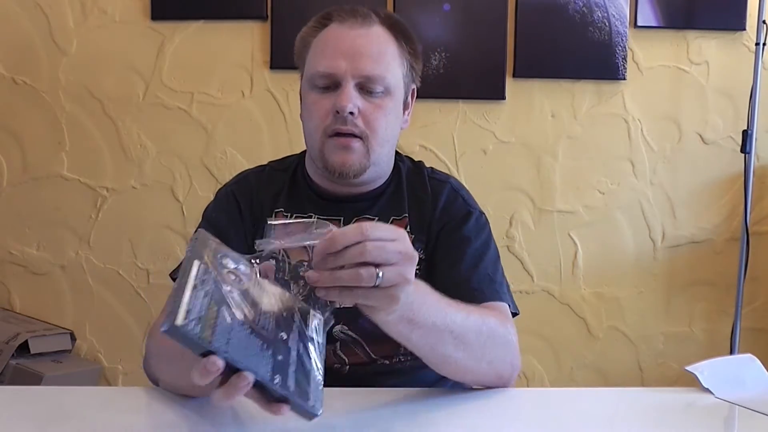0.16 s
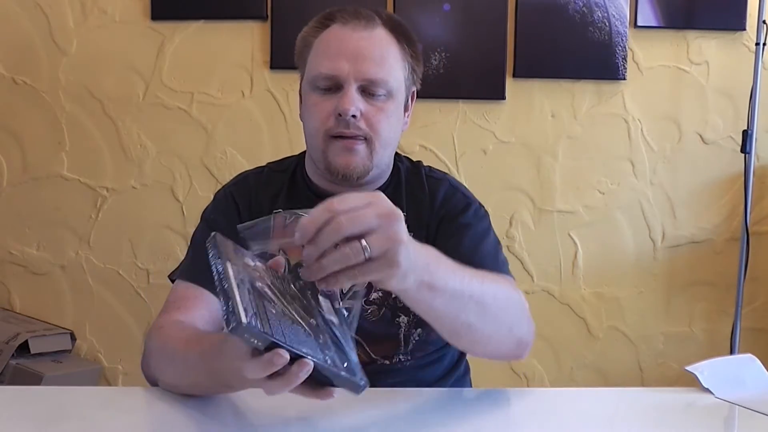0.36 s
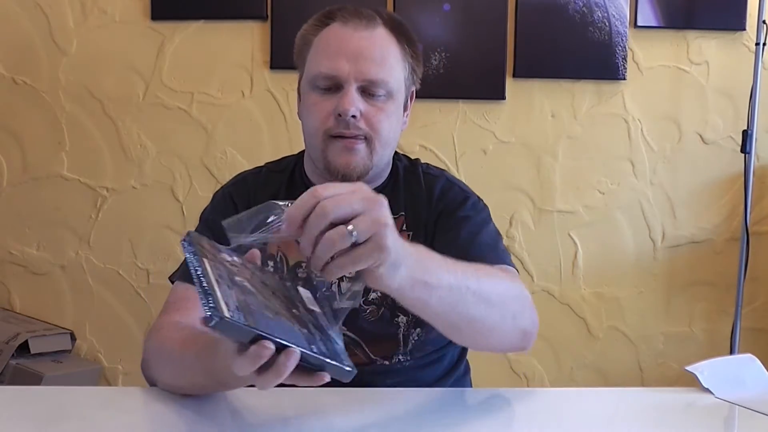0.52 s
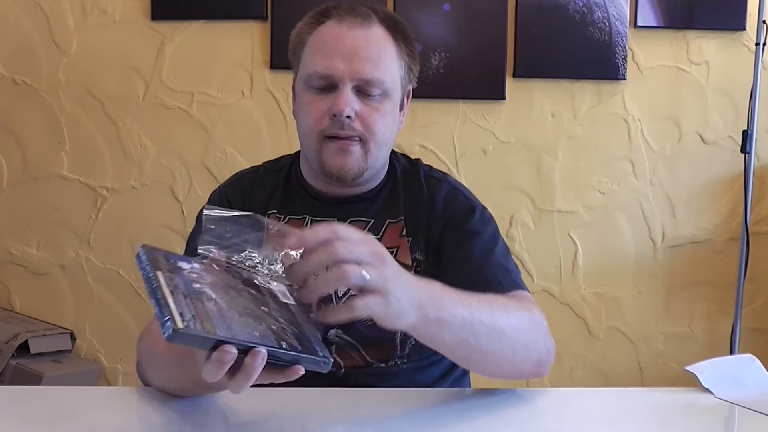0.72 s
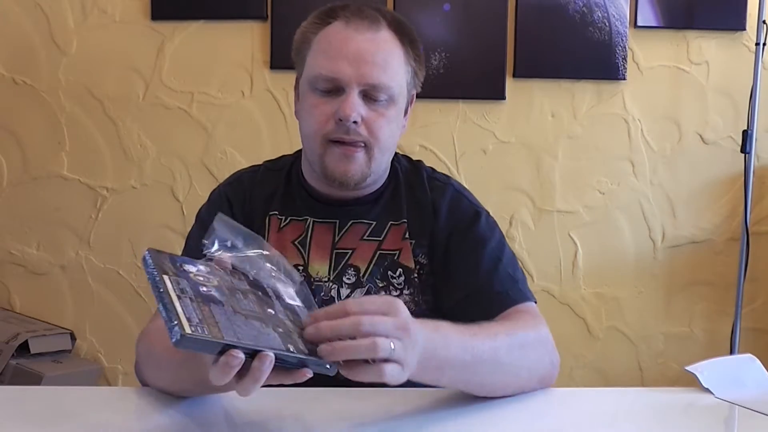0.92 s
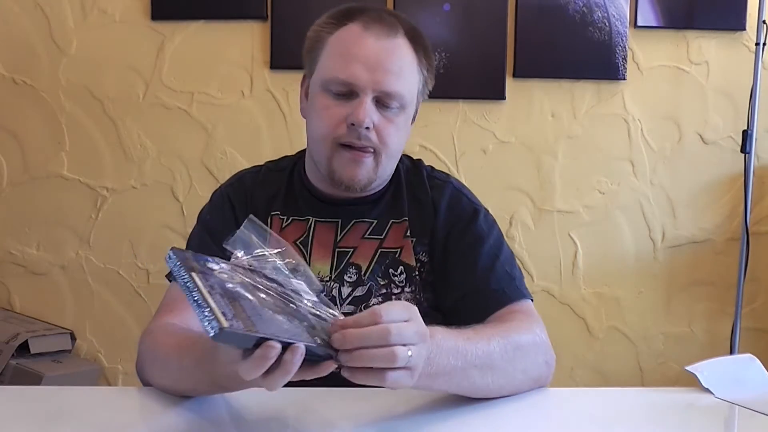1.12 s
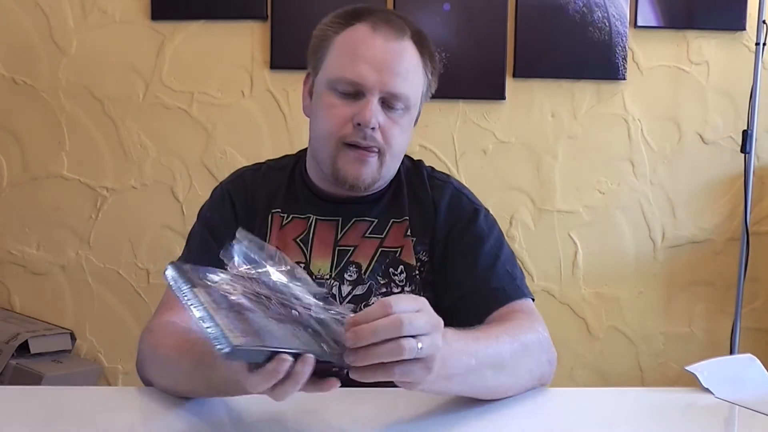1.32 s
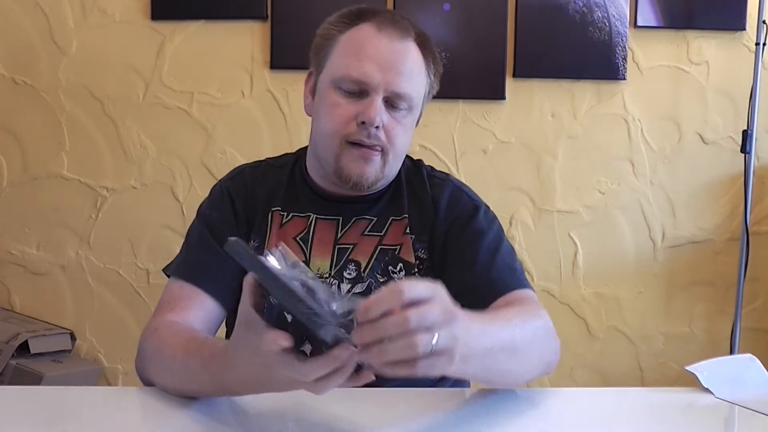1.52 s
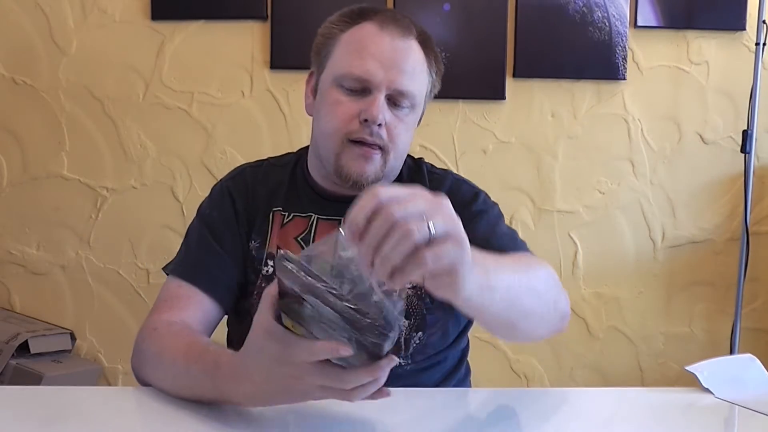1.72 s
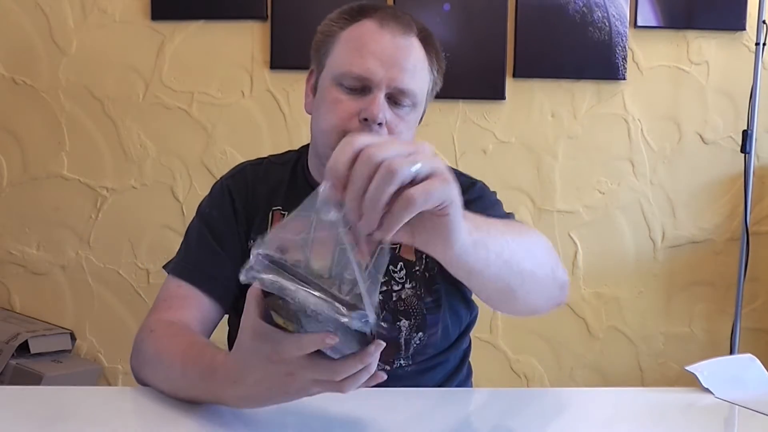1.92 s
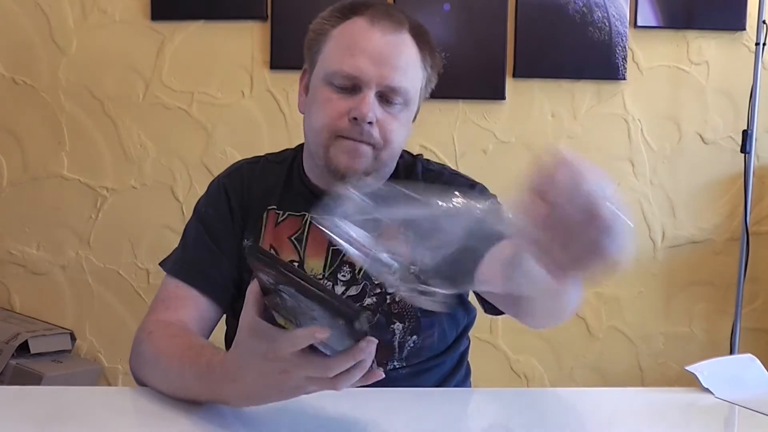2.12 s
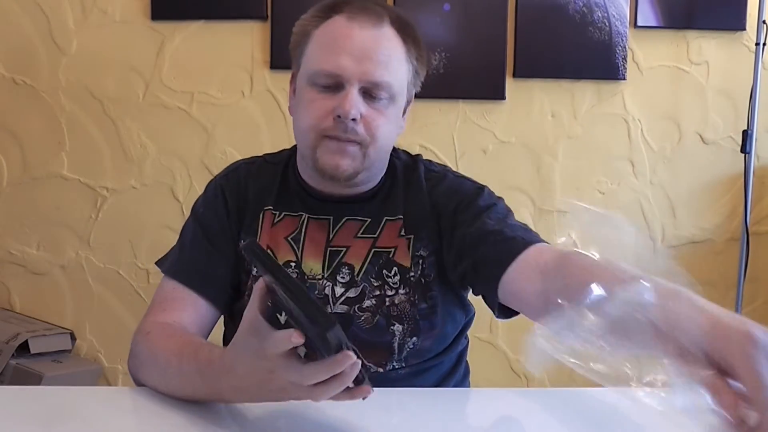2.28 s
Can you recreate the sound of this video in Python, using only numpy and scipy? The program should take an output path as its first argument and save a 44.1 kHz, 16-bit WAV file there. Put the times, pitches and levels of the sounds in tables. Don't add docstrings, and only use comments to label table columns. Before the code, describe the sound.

Crisp plastic film rustles and snaps close to the microphone, knocking and scraping a hollow plastic case; short quiet gaps, two strong cracks, then busy crackle thinning out in a small, quiet, slightly reverberant room.

```python
import sys
import numpy as np
from scipy import signal
from scipy.fft import rfft, irfft, next_fast_len
from scipy.io import wavfile

SR = 44100
rng = np.random.default_rng(int(sys.argv[2]) if len(sys.argv) > 2 else 0)


def unload_wav(signal):
    wavfile.write(
        sys.argv[1],
        SR,
        np.round(np.clip(np.atleast_2d(signal).T, -1, 1) * 32767).astype(np.int16),
    )


def voltage_ratio(level):
    return 10 ** (np.asarray(level, float) / 20)


N = 103635

# frequency in Hz, level in dB, decay time T60 in s.
CASE_MODES = [(236, 3.5, 0.095), (388, -21, 0.17), (550, -6, 0.12), (669, -1, 0.065), (878, -27, 0.017),
              (952, -9.5, 0.077), (1177.4, -3, 0.17), (1319, 6, 0.023), (1700, -35, .03),
              (1780, 5.5, 0.022), (2071, 8, 0.021), (2238, 4.5, 0.02)]
# frequency in Hz, density in dB per Hz.
FILM_SPECTRUM = [(1290, -8.5), (2200, -10), (3170, -8), (3840, 0), (5670, -0.5), (7520, 2), (10800, -5),
                 (15200, -13.5), (16000, -37)]


def rms_one(x):
    return x / np.sqrt(np.mean(x ** 2) + 1e-20)


def coloured(x, points):
    hz, db = np.transpose(points)
    f = np.maximum(np.fft.rfftfreq(N, 1 / SR), 5)
    octaves_outside = np.maximum(np.log2(hz[0] / f), 0) + np.maximum(np.log2(f / hz[-1]), 0)
    gain_db = np.interp(np.log(f), np.log(hz), db) - 18 * octaves_outside
    return irfft(rfft(x) * voltage_ratio(gain_db), N)


def drift(rate_hz):
    r = np.exp(-2 * np.pi * rate_hz / SR)
    noise = rng.standard_normal(N + SR)
    return rms_one(signal.lfilter([1], [1, -2 * r, r * r], noise)[SR:])


def ring(clicks, hz, t60):
    r, w = voltage_ratio(-60 / (t60 * SR)), 2 * np.pi * hz / SR
    return signal.lfilter([0, np.sin(w)], [1, -2 * r * np.cos(w), r * r], clicks + 1e-18)


def butter(order, hz, kind, x):
    return signal.sosfilt(signal.butter(order, hz, kind, fs=SR, output="sos"), x)


def air():
    # frequency in Hz, density in dB per Hz.
    air_spectrum = [(25, -17), (70, -15.5), (200, -10.5), (600, -7.5), (2000, -12.5), (2800, -17),
                    (6500, -15), (16000, -23)]
    # frequency in Hz, rms level in dB.
    mains = [
        (50, -86.5),
        (100, -85),
    ]
    t = np.arange(N) / SR
    mid, side = coloured(rng.standard_normal((2, N)), air_spectrum)
    hum = sum(voltage_ratio(db) * np.sqrt(2) * np.sin(2 * np.pi * hz * t) for hz, db in mains)
    tone = rms_one(mid + 0.91 * side * np.array([[1], [-1]]))
    return voltage_ratio(-61.5) * tone + hum * np.array([[1.3], [0.7]])


def effort():
    # length in s, rustle at start in dB, rustle at end in dB, drag on the case in dB.
    pulls = [(0.12, -67.5, -70, 5), (0.032, -44, -35.5, -0.9), (0.035, -43, -44.5, -4),
             (0.068, -58.5, -48, -2), (.12, -51, -50.5, -5), (0.15, -54.5, -52, -3), (0.022, -44, -52, -6),
             (0.043, -56, -58.5, -6), (.075, -58.5, -69, -25), (0.069, -48, -55.5, -3.5),
             (.15, -54, -53.5, -8), (0.145, -64.5, -60, -5.5), (0.046, -60, -42, -11.5),
             (.12, -48.5, -62, 6), (0.107, -55, -53, -4.5), (0.059, -47.5, -46, 0), (0.042, -54.5, -53, -3),
             (0.12, -49, -56.5, -2), (0.069, -58.5, -47.5, -6), (0.0042, -31, -42, -4),
             (0.083, -55, -55.5, -4), (0.1, -63, -71, 0), (0.081, -56.5, -74.5, -12)]
    starts = [0, .2055, .25, .289, .364, .52, .6985, .735, .82, 1.0275, 1.097, 1.26, 1.41, 1.448, 1.576,
              1.681, 1.757, 1.812, 1.951, 2.0225, 2.033, 2.128, 2.246]
    film_rise_s, drag_rise_s, fall_s, drag_fade_db_per_s = 0.0025, 0.013, 0.023, 38
    t = np.arange(N) / SR
    film_power, drag_power = np.zeros(N), np.zeros(N)
    for s, (length, start_db, end_db, drag_db) in zip(starts, pulls):
        under_way = s == 0
        slide = voltage_ratio(np.interp(t, [s, s + length], [start_db, end_db]))
        power = (np.exp(-np.maximum(t - s - length, 0) / fall_s) * slide) ** 2
        film_rise = np.clip((t - s) / film_rise_s + under_way, 0, 1)
        drag_rise = np.clip((t - s) / drag_rise_s + under_way, 0, 1)
        fade_db = drag_fade_db_per_s * np.clip(t - s - drag_rise_s, 0, length)
        film_power += power * film_rise ** 2
        drag_power += power * voltage_ratio(2 * (drag_db - fade_db)) * drag_rise ** 2
    return np.sqrt(film_power), np.sqrt(drag_power)


def creases(low_hz, high_hz, clump_db):
    per_s, spread_db, cycles, smooth_share = 3500, 3.2, 18.0, 0.4
    sizes = voltage_ratio(spread_db * np.minimum(rng.exponential(1, N), 3.2)) * rng.choice([-1, 1], N)
    born = rng.random(N) < per_s * voltage_ratio(clump_db * drift(25)) / SR
    pitch = rng.integers(0, 14, N)
    rings = np.zeros(N)
    for k, hz in enumerate(np.geomspace(low_hz, high_hz, 14)):
        rings += ring(sizes * born * (pitch == k), hz, cycles / hz) * hz ** 1.2
    friction = rng.standard_normal(N)
    return np.sqrt(1 - smooth_share) * rms_one(rings) + np.sqrt(smooth_share) * friction


def rustle(gain):
    # time in s, lift of the highest hiss in dB.
    tautness = [(0, 12.5), (.24, -3), (.3, -4), (.37, -1), (.48, -5), (.53, -7), (.71, -6), (.9, 3),
                (1.25, -4), (1.42, -3), (1.52, 0), (1.68, 6.5), (1.9, 8), (2.05, 8), (2.15, 1), (2.35, 12)]
    film = gain * rms_one(coloured(creases(2270, 15800, clump_db=4.5), FILM_SPECTRUM))
    hiss = signal.sosfiltfilt(signal.butter(2, 9300, "high", fs=SR, output="sos"), film)
    lift_db = np.interp(np.arange(N) / SR, *np.transpose(tautness))
    return film + (voltage_ratio(lift_db) - 1) * hiss


def loose_sheet(gain):
    return voltage_ratio(-8.5) * gain * rms_one(coloured(rng.standard_normal(N), FILM_SPECTRUM))


def drag(gain):
    # frequency in Hz, density in dB per Hz.
    scrape_spectrum = [(100, -24), (170, -12), (552, 4), (754, 0.5), (840, -3), (1790, -5), (3000, -14.5),
                       (3900, -12.5), (6600, -50)]
    grit = gain * voltage_ratio(0.43 * drift(18.0)) * creases(915, 7270, clump_db=3.5)
    walls = np.zeros(N)
    for k, (hz, db, t60) in enumerate(CASE_MODES):
        walls += ring(grit, hz, t60) * voltage_ratio(db) * (-1) ** k / np.sqrt(t60)
    return np.std(grit) * (rms_one(coloured(grit, scrape_spectrum)) + voltage_ratio(-9) * rms_one(walls))


def room(x):
    t60_s, wall_cut_hz, wide_hz = 0.24, 2200, 624
    size = next_fast_len(N + SR)
    w = 2 * np.pi * np.fft.rfftfreq(size, 1 / SR)
    out = np.zeros((2, len(w)), complex)
    for k, lag in enumerate(rng.uniform(0.009, 0.04, 16)):
        absorption = 1 + 1j * w / (2 * np.pi * wall_cut_hz) * lag / 0.019
        loop = voltage_ratio(-60 * lag / t60_s) * np.exp(-1j * w * lag) / absorption
        out[k % 2] += loop / (1 - loop) * (-1) ** (k // 2)
    shared = out.mean(0)
    apart = 1 / (1 + (2 * np.pi * wide_hz / (w + 1)) ** 2)
    return irfft((shared + apart * (out - shared)) * rfft(x, size), size)[:, :N]


def knocks():
    # time in s, peak in dB, strongest pitch in Hz, dead thud in dB.
    tugs = [(0.047, -53, 648, 6), (0.071, -50.5, 473, 7), (0.2074, -31.5, 1780, 12.5),
            (.449, -49.5, 582, -10), (0.559, -50.5, 556, -21), (0.6998, -42.5, 472, 7.5),
            (.995, -57, 526, -17), (1.0316, -37.5, 550, -29), (0.821, -56, 1330, 7), (1.158, -50, 231, -5),
            (1.317, -56.5, 1215, 3), (1.4483, -29.5, 702, 15.5), (1.6996, -37.5, 1887, -9),
            (1.7438, -42, 1910, -5), (1.852, -44.5, 340, -5), (2.0239, -49, 235, 15),
            (2.0277, -39.5, 1700, -2), (2.035, -44, 585, -31), (2.2489, -51, 1590, -46),
            (2.260, -52, 1880, -22)]
    chances = rng.standard_normal((len(tugs), len(CASE_MODES)))
    out = np.zeros(N + SR)
    tick = np.r_[1.0, np.zeros(SR // 4)]
    thud = ring(tick, 900, 0.0034)
    for (s, db, own_hz, thud_db), chance in zip(tugs, chances):
        own_t60 = 0.051 * min(np.sqrt(550 / own_hz), own_hz / 550)
        sound = ring(tick, own_hz, own_t60) + voltage_ratio(thud_db) * thud
        for (hz, level_db, t60), c in zip(CASE_MODES, chance):
            sound = sound + voltage_ratio(-15.5 + level_db + 2 * c) * ring(tick, hz, t60)
        i = int(s * SR)
        out[i:i + len(tick)] += voltage_ratio(db) * sound
    out = out[:N]
    return butter(4, 250, "high", out) + voltage_ratio(-19) * out


def snaps():
    # time in s, peak in dB, pitch in Hz.
    early = [(0.0479, -38, 6300), (0.0688, -39, 6100), (0.1259, -45, 2600), (0.1979, -43, 7600),
             (0.2078, -9, 4100), (0.2088, -19, 6500), (0.2231, -27, 7000), (0.2278, -31, 4300),
             (0.2667, -27, 6800), (0.2766, -34, 8400), (0.3742, -36, 5400), (0.5578, -31, 8000),
             (0.6755, -43, 10200), (0.7008, -33, 7400), (0.7071, -30, 6300), (0.7102, -33, 6400),
             (0.7148, -34, 8500), (0.7172, -36, 3700), (0.7292, -23, 7300), (0.7592, -42, 10900),
             (0.7833, -48, 6600), (0.8226, -45, 8200), (0.9941, -42, 4500), (1.0291, -30, 6800),
             (1.0323, -35, 3800), (1.0726, -36, 5200), (1.0769, -39, 7800), (1.0789, -38, 6700),
             (1.0815, -34, 7700), (1.0853, -30, 7400), (1.0976, -33, 7600), (1.1024, -33, 8100),
             (1.1057, -23, 7900), (1.1221, -39, 8200), (1.1452, -42, 7400), (1.1594, -34, 8100),
             (1.1824, -41, 7200), (1.2893, -43, 7800), (1.3163, -32, 7700), (1.3717, -40, 9400),
             (1.3797, -35, 7900), (1.412, -40, 11800), (1.449, -15, 4300), (1.4508, -24, 8500),
             (1.4549, -30, 8800), (1.4818, -26, 8400), (1.5085, -38, 9000), (1.5316, -39, 7900)]
    # time in s, peak in dB, pitch in Hz.
    late = [(1.5369, -40, 4900), (1.5777, -27, 7100), (1.589, -39, 7400), (1.5926, -34, 6400),
            (1.604, -36, 9600), (1.6152, -38, 5600), (1.6203, -38, 5200), (1.6298, -31, 6000),
            (1.6417, -26, 8800), (1.6436, -34, 8300), (1.6471, -34, 8400), (1.6515, -33, 7400),
            (1.671, -31, 8300), (1.6777, -33, 10500), (1.6832, -33, 7700), (1.689, -33, 7400),
            (1.7005, -25, 5500), (1.7112, -28, 5600), (1.72, -31, 5300), (1.7298, -30, 11400),
            (1.7452, -28, 8200), (1.7538, -30, 7000), (1.782, -37, 10900), (1.8187, -34, 8300),
            (1.8268, -32, 7700), (1.829, -33, 8100), (1.847, -34, 5700), (1.8752, -33, 6900),
            (2.023, -26, 11000), (2.0272, -20, 7100), (2.0389, -32, 7200), (2.0516, -33, 10400),
            (2.0565, -29, 9200), (2.0665, -37, 12100), (2.0779, -33, 7100), (2.088, -37, 7200),
            (2.0975, -40, 7500), (2.1158, -43, 7900), (2.1449, -44, 7600), (2.1558, -46, 5300),
            (2.1831, -50, 5200), (2.1985, -50, 6400), (2.2167, -49, 5700), (2.2484, -38, 5200),
            (2.2605, -31, 7100), (2.281, -44, 7500), (2.3174, -45, 7900), (2.3475, -49, 5000)]
    rise_s, lag_s, t60_s, width = 0.0001, 0.0002, 0.006, 0.5
    rows, t = list(early) + list(late), np.arange(1024) / SR
    out = np.zeros((2, N + 2048))
    for s, db, hz in rows:
        decay = voltage_ratio(-60 * t / (t60_s * voltage_ratio(0.12 * (db + 29))))
        burst = rng.standard_normal(len(t)) * np.minimum(t / rise_s, 1) * decay
        burst[3] = 2.5 * np.sign(burst[3])
        band = [hz * (1 - width / 2), min(hz * (1 + width / 2), 19000)]
        pitched = rms_one(butter(2, band, "band", burst))
        broad = voltage_ratio(-1 + 0.3 * (db + 35.5)) * rms_one(burst)
        burst = butter(2, [1900, 14500], "band", pitched + broad)
        i = int(s * SR) - np.abs(burst[:20]).argmax() + int(lag_s * SR)
        pan_db = 2 * rng.standard_normal() * np.array([[0.5], [-0.5]])
        out[:, i:i + len(t)] += voltage_ratio(db - 2 + pan_db) * burst / np.abs(burst).max()
    return signal.lfilter(*signal.iirnotch(3250, 10, fs=SR), out[:, :N])


def rip():
    start_s, swell_s, centre_hz, width_hz = 0.2085, 0.023, 1096, 730
    u = np.maximum(np.arange(N) / SR - start_s, 0) / swell_s
    band = [centre_hz - width_hz / 2, centre_hz + width_hz / 2]
    grit = rms_one(butter(2, band, "band", rng.standard_normal(N)))
    return voltage_ratio(-39) * u * np.exp(1 - u) * grit


def squeak():
    # time in s, frequency of the octave in Hz, level in dB.
    slips = [
        (1.15, 1338, -94),
        (1.19, 1336, -66),
        (1.22, 1335, -83),
        (1.25, 1336, -70),
        (1.28, 1388, -71),
        (1.31, 1333, -82),
        (1.37, 1362, -73),
        (1.42, 1403, -71),
        (1.45, 1400, -84),
    ]
    s, hz, db = np.transpose(slips)
    t = np.arange(N) / SR
    wobble = 1 + 0.0121 * drift(32.5)
    phase = np.cumsum(np.pi * np.interp(t, s, hz) * wobble) / SR
    gain = voltage_ratio(np.interp(t, s, db, left=-150, right=-150) + 3.5 * drift(40))
    return np.sqrt(2) * gain * (np.sin(2 * phase) + voltage_ratio(-5) * np.sin(phase))


def scene():
    film_gain, drag_gain = effort()
    film_gain = film_gain * voltage_ratio(0.17 * drift(45))
    cracks = snaps()
    near = rustle(film_gain) + drag(drag_gain) + cracks.mean(0) + knocks() + squeak() + rip()
    hand_leaves = np.clip((np.arange(N) / SR - 2.15) / 0.2, 0, 1)
    lean_db = 1.6 - 4 * hand_leaves
    near_treble, loose_treble = butter(2, 7000, "high", [near, loose_sheet(film_gain)])
    side = voltage_ratio(-27) * np.r_[np.zeros(23), near[:-23]]
    side = side + voltage_ratio(-11.5) * np.r_[np.zeros(61), near_treble[:-61]]
    side = side + loose_treble + (cracks[0] - cracks[1]) / 2
    direct = near * voltage_ratio(np.array([lean_db, -lean_db]) / 2) + side * np.array([[1], [-1]])
    return direct + voltage_ratio(-11.5) * room(near) + air()


def low_pass(x):
    return signal.sosfilt(signal.butter(12, 16990, fs=SR, output="sos"), x)


def record(dry):
    shelf = np.where(np.fft.rfftfreq(N, 1 / SR) > 15780, voltage_ratio(-30), 1)
    return low_pass(irfft(rfft(dry) * shelf, N))


dry = scene()
out = record(dry)
unload_wav(out)
```